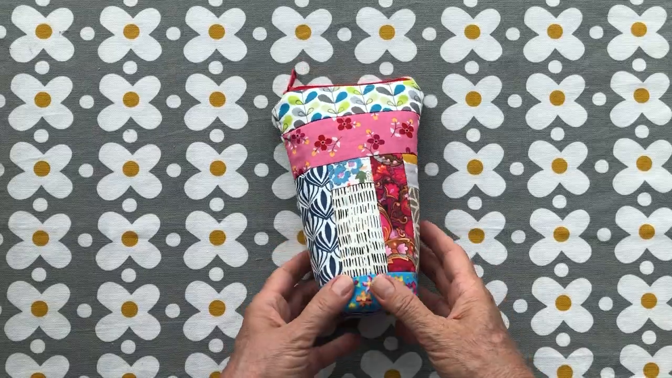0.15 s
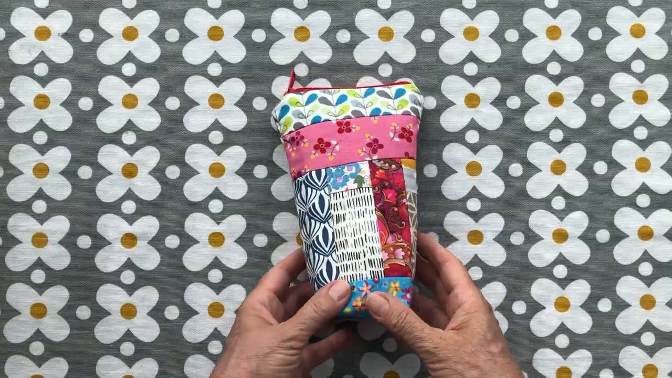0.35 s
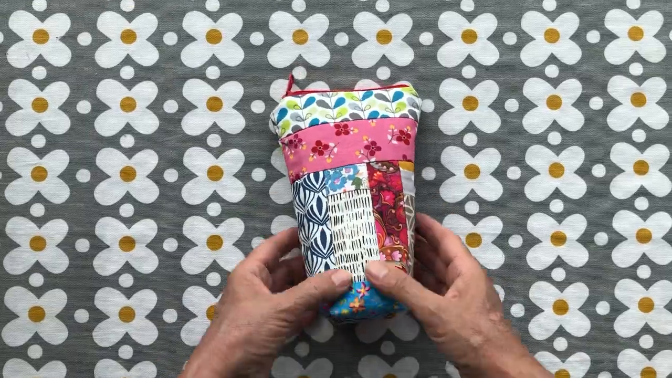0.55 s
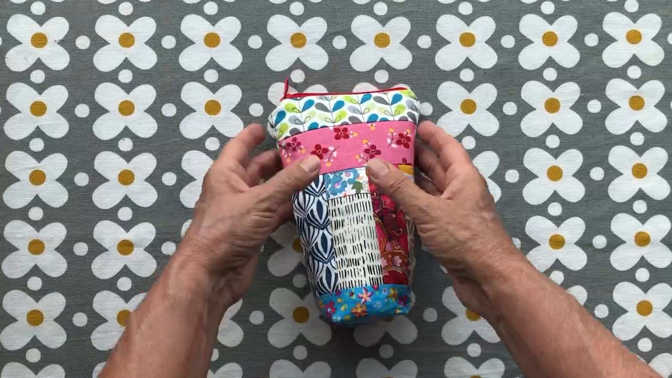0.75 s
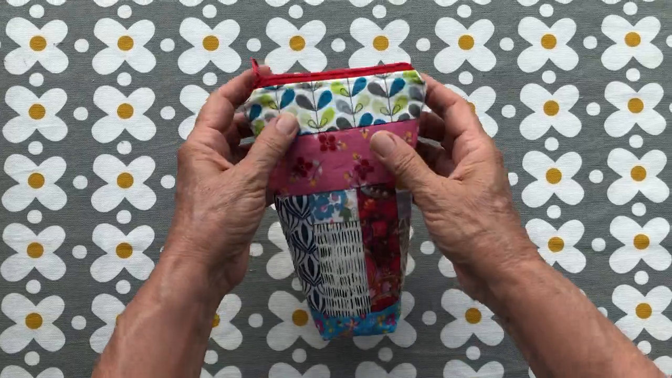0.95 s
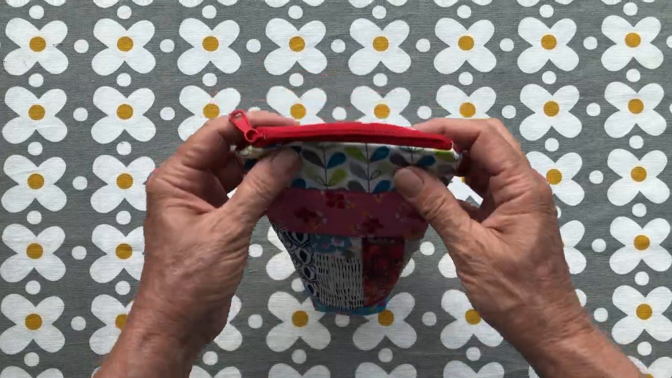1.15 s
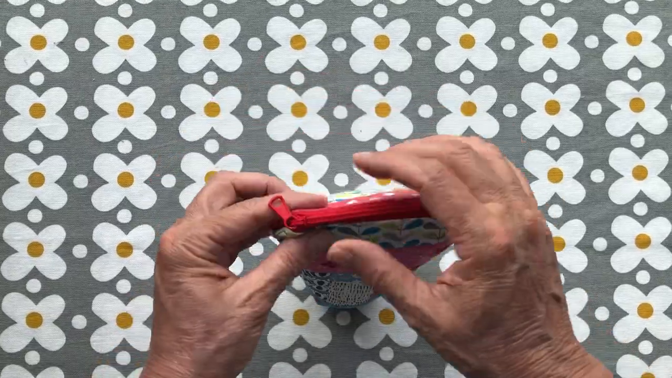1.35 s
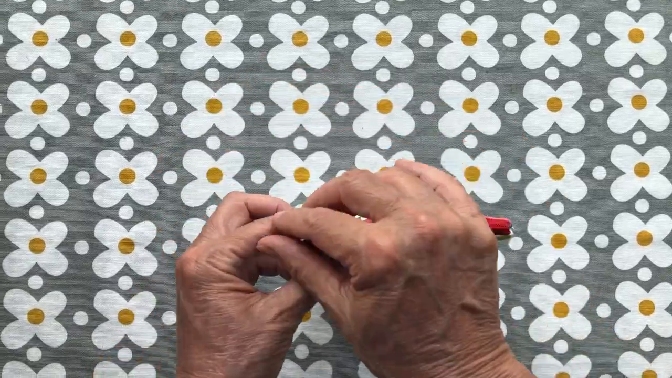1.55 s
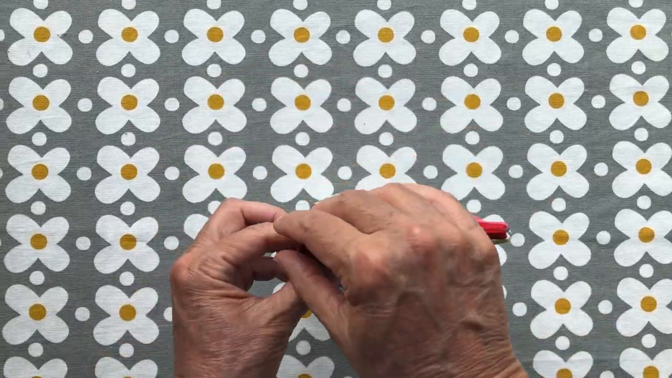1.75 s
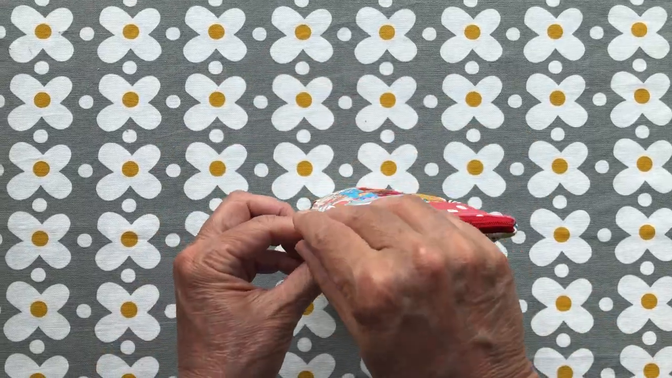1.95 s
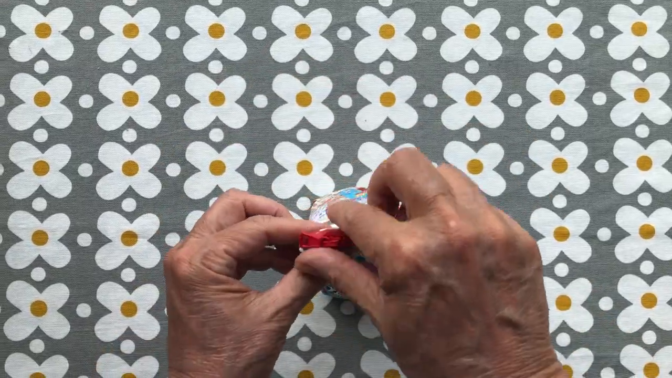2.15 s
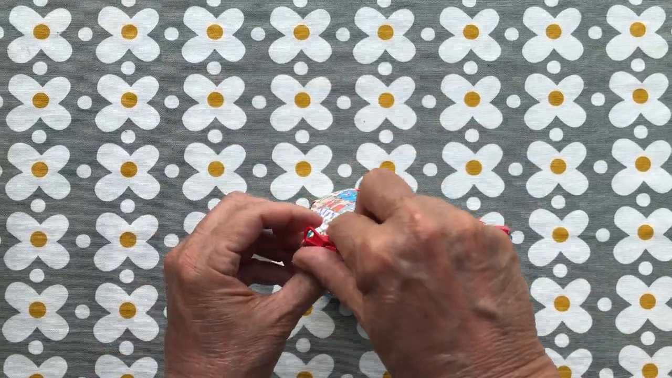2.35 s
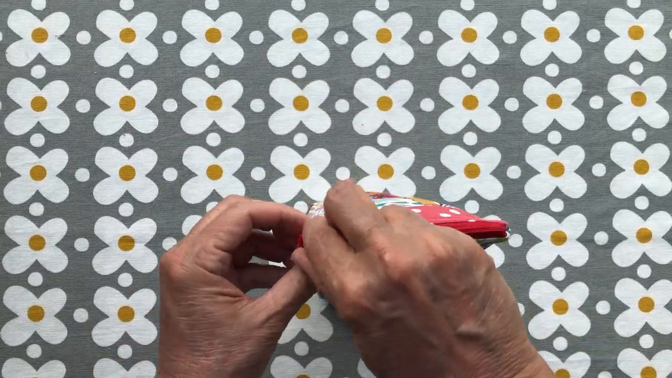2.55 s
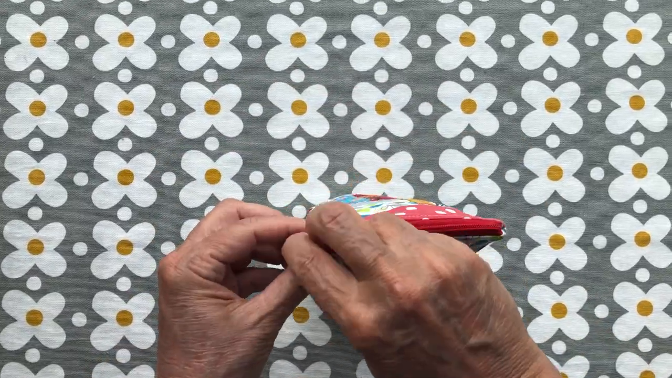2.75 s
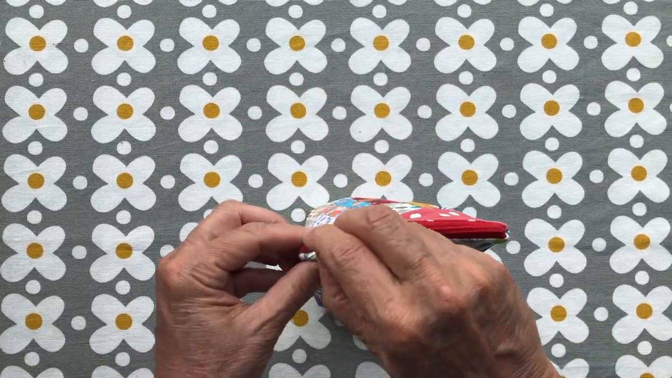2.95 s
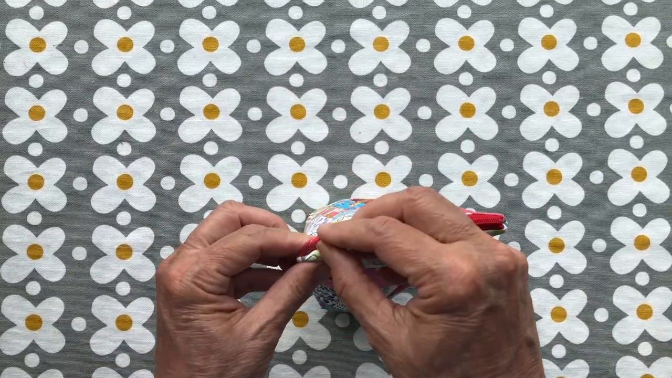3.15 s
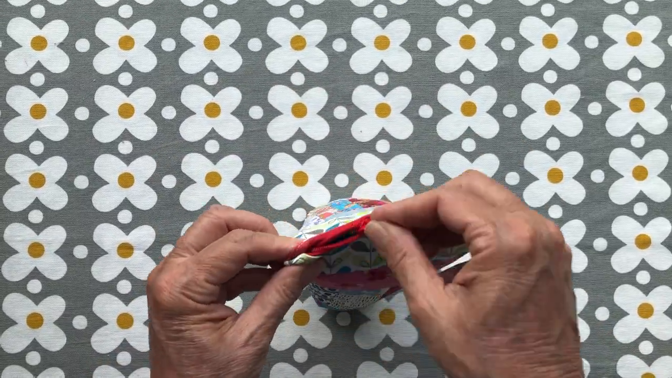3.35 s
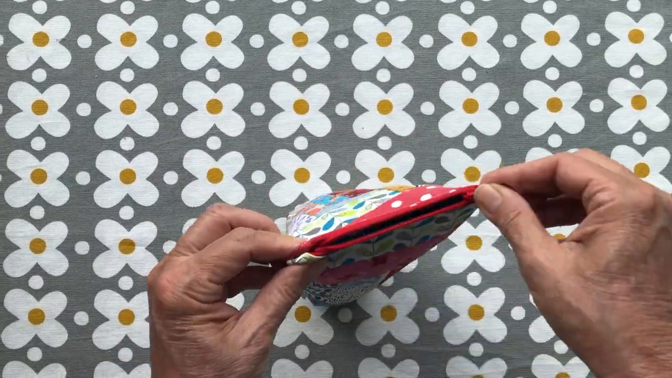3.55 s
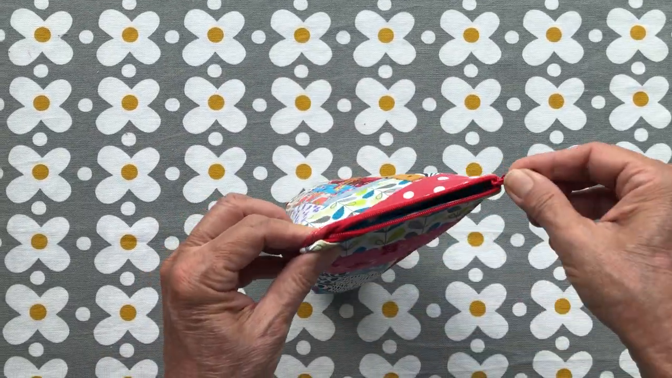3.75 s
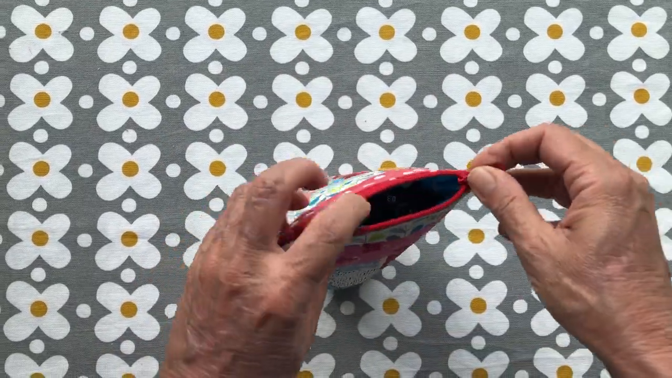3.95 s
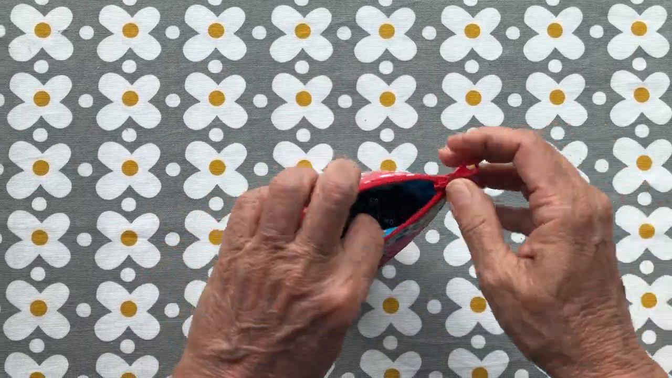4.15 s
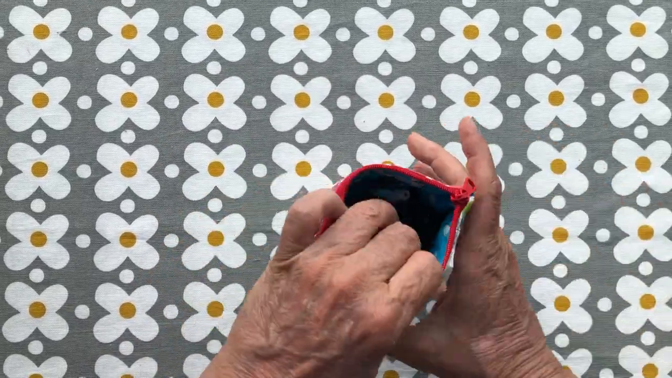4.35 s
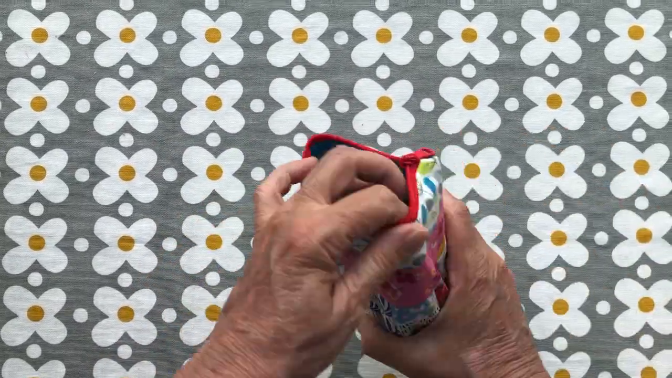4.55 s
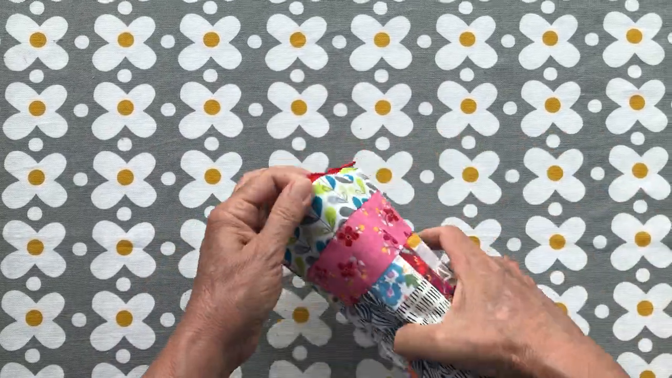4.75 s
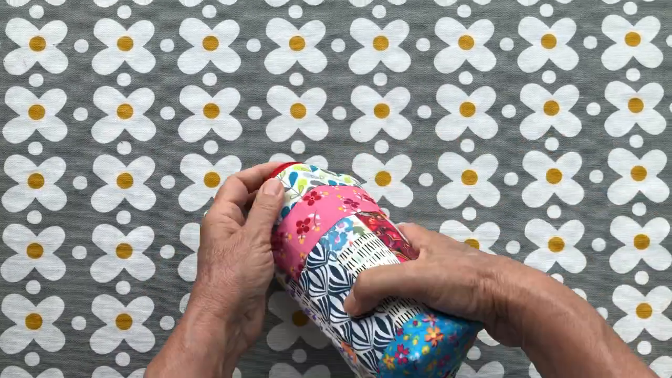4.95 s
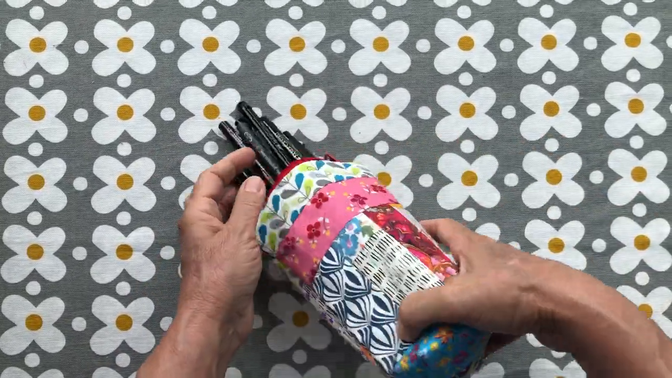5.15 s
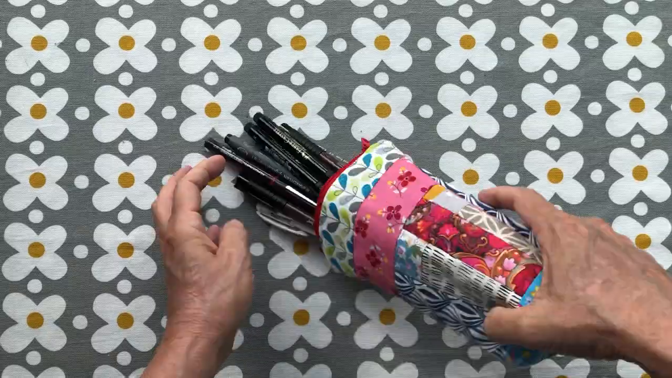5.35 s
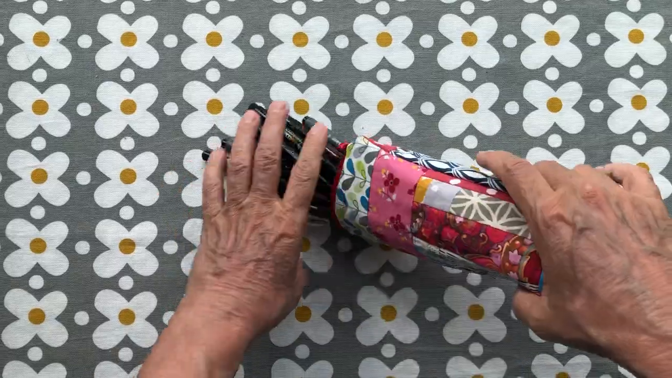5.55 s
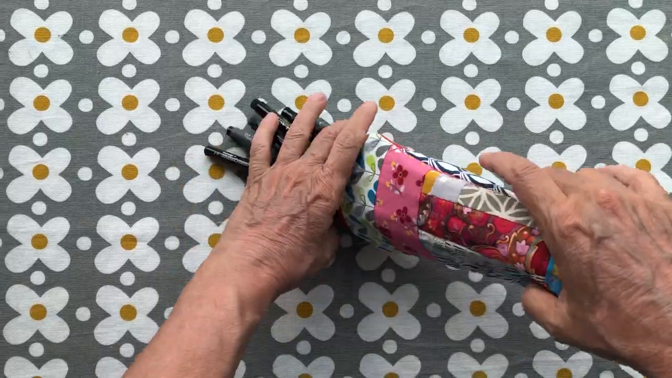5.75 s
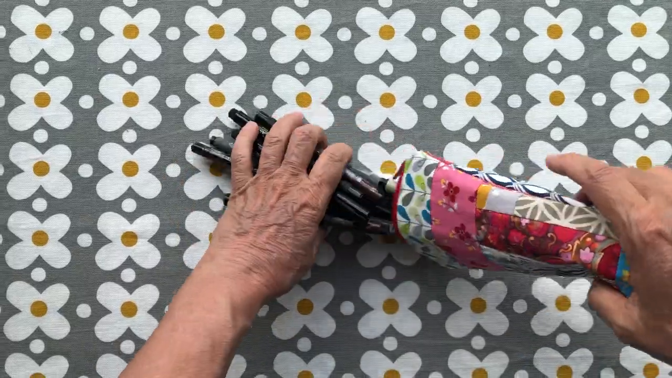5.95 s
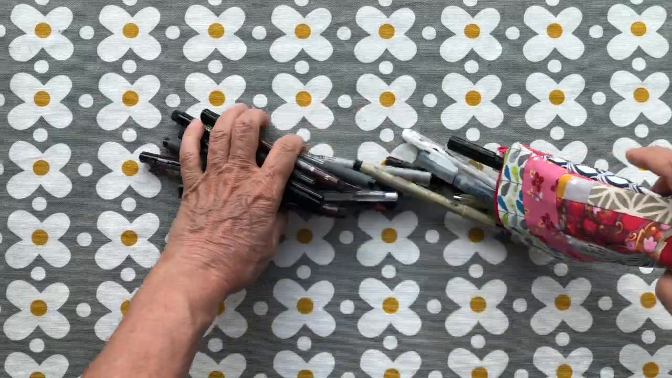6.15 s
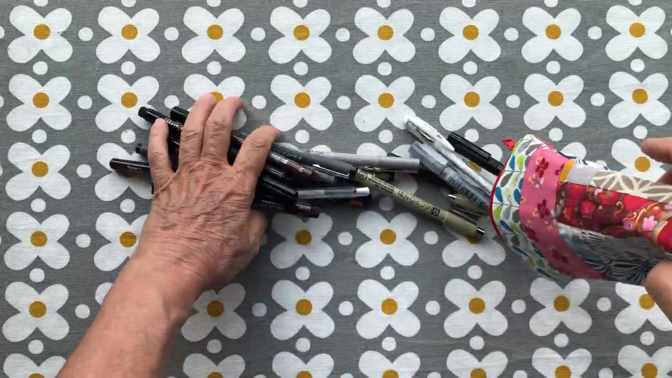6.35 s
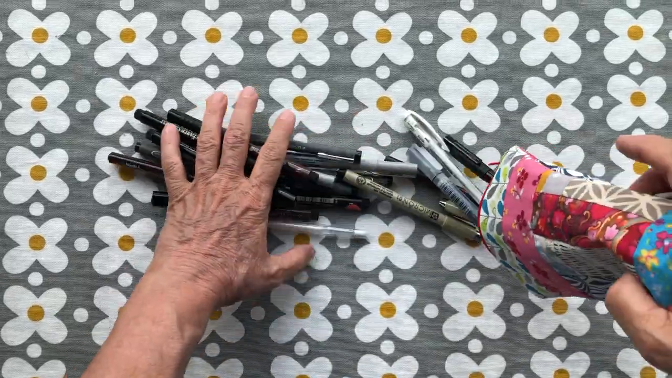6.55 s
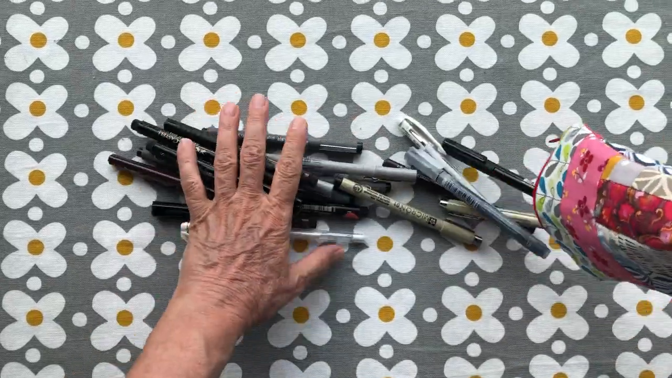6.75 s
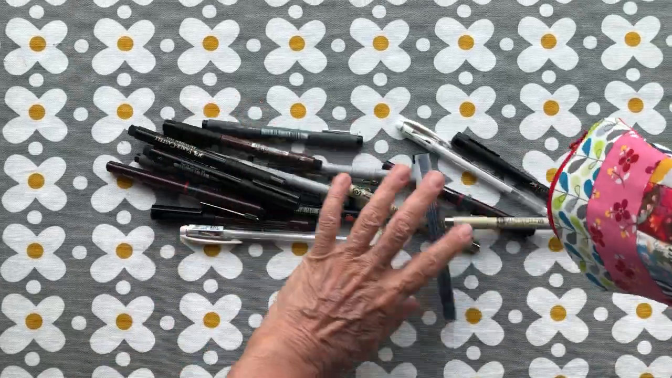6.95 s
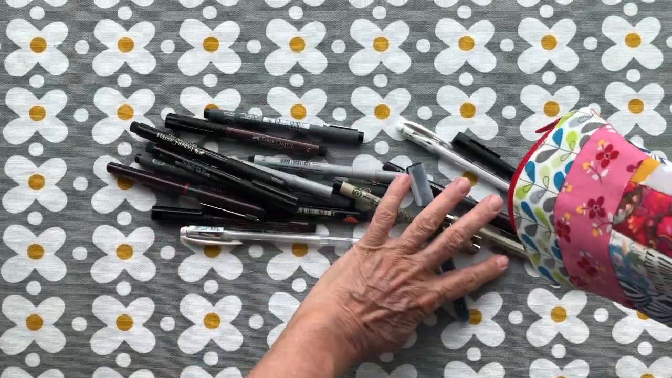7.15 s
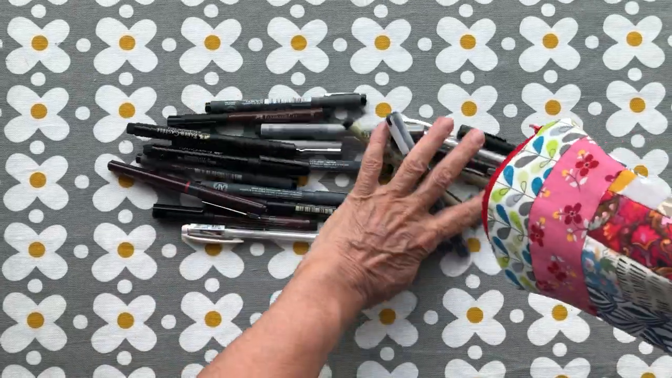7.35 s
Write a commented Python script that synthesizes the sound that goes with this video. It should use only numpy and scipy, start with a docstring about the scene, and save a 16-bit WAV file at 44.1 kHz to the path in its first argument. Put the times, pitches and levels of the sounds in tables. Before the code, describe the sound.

Hands rustle a fabric pouch and unzip it, then pens slide out, clicking together and knocking on a table.

```python
"""A few plastic clicks, a soft bump and a rustle: hands pick up a fabric pouch full of pens.
They stand it on a cloth-covered table and unzip it in one quickening pull, the teeth running
from hollow ticks into a whine. Fingers catch and slip on the weave until the pouch is tipped
over: pens scrape out along the lining, click against each other and knock on the table top.
All is heard close up in a small, quiet room."""
import sys
import numpy as np
from scipy import signal
from scipy.fft import rfft, irfft, next_fast_len
from scipy.io import wavfile
from scipy.ndimage import uniform_filter1d, map_coordinates

SR = 44100
rng = np.random.default_rng(int(sys.argv[2]) if len(sys.argv) > 2 else 0)


def wav_out(sig):
    """Save sig, one row per channel (or a flat mono array), as 16-bit PCM at SR to the path in sys.argv[1]."""
    wavfile.write(sys.argv[1], SR, np.round(np.clip(np.atleast_2d(sig).T, -1, 1) * 32767).astype(np.int16))


N = 326340
TIME = np.arange(N) / SR
RING_TIME = np.arange(SR // 3) / SR

# the sharpest pen-on-pen hits: (time [s], level [dB], clack pitch [Hz], snap brightness [dB])
PEN_CLICKS = [(.0925, -36.5, 2200, -14), (0.1015, -32.5, 4830, -15), (0.1119, -36, 2560, 6.5),
              (1.054, -51, 2390, -2), (3.962, -46.5, 3700, -14), (4.3832, -49, 3160, -16),
              (4.461, -52, 3130, -8), (4.5198, -42.5, 4900, -3), (4.5403, -42.5, 4660, -25),
              (4.591, -45, 4670, -17), (4.632, -44, 4760, -19), (4.676, -40, 2940, -4),
              (4.9468, -39, 3800, 2), (5.001, -34, 5730, -7), (5.04, -43, 2100, 11.5),
              (5.0577, -38, 5000, 5), (5.0796, -31.5, 2450, 0.5), (5.1118, -34.5, 4770, 0),
              (5.1376, -31, 3080, 3), (5.213, -38.5, 5700, -10), (5.3363, -39, 2270, -5),
              (5.6024, -41.5, 2420, -27), (5.6187, -39.5, 3180, -8), (5.648, -45, 2590, -5),
              (5.7803, -45.5, 2270, -25), (5.8494, -44, 3200, 4.5), (5.9623, -40, 3930, 2),
              (6.0093, -29, 3640, -25), (6.036, -35, 3430, -13), (6.096, -32, 4300, -6),
              (6.108, -33.5, 3410, -10), (6.155, -29, 4600, -6), (6.2155, -47.5, 3550, 14),
              (6.228, -45, 3500, 10), (6.24, -32.5, 5200, -22), (6.5052, -24.5, 3600, -35),
              (6.5517, -37.5, 4280, 9.5), (6.562, -38, 3100, -1), (6.6496, -24.5, 4330, -20),
              (6.7247, -42, 4590, -16), (6.7536, -44.5, 3820, -22), (6.823, -45, 1920, -11),
              (6.8399, -38.5, 2890, -24), (6.9108, -32.5, 2650, -11), (6.9363, -27.5, 2580, -30),
              (7.058, -38.5, 3160, -23), (7.1409, -45.5, 3270, 10.5), (7.1756, -46.5, 3820, -10),
              (7.2456, -40.5, 4350, 6), (7.2932, -40, 4080, -3), (7.3558, -35, 4270, -1),
              (7.372, -32, 4140, -3)]
# ring of a pen barrel: (frequency [Hz], level [dB], t60 [s])
BARREL_MODES = [(2840, 0, 0.017), (3243, 11.5, 0.032), (4200, -26.5, 0.014), (4100, 11, 0.044),
                (4900, 4.5, 0.046), (5900, 1, 0.038)]
# shoves that send the pens sliding: (peak time [s], level [dB], rise [s], fall [s])
PEN_SHOVES = [(4.96, -51.5, .025, 0.16), (5.125, -40.5, 0.15, .115), (5.225, -53, 0.04, 0.28),
              (5.43, -62, 0.13, 0.8), (5.62, -60.5, 0.086, 0.14), (5.865, -51, 0.037, 0.47),
              (5.99, -45.5, 0.17, 0.25), (6.105, -45.5, 0.085, 0.23), (6.245, -50, 0.043, 0.096),
              (6.49, -54.5, 0.25, 0.2), (6.66, -57.5, 0.26, 0.28), (6.948, -45, 0.041, 0.16),
              (7.178, -60, .015, 0.21), (7.3, -48, 0.017, 0.054), (7.395, -42, 0.088, 0.088)]
# colour of pens on the lining: (frequency [Hz], level [dB])
SCRAPE_SPECTRUM = [(180, -8), (300, -1.5), (433, 1), (584, -16.5), (814, -11.5), (915, -10), (1430, -7.5),
                   (1610, -7), (4230, -9.5), (14200, -19.5), (16000, -38.5)]
# pouch and pens landing on the table: (time [s], level [dB], contact time [ms])
LANDINGS = [(.089, -39, 6.5), (.117, -47.5, 3.5), (1.346, -35.5, 2.4), (1.361, -44.5, 3.1),
            (4.266, -58.5, 0.8), (4.933, -51.5, 1), (5.085, -33.5, 0.93), (5.095, -35.5, 1.07),
            (5.134, -33, 7), (5.161, -34, 7), (5.338, -43.5, 3.5), (5.616, -56, 0.69), (6.009, -47, 0.3),
            (6.096, -33, 3.9), (6.195, -40, 2.9), (6.25, -38, 1.8), (6.505, -45.5, 2.5), (6.548, -42, 1.9),
            (6.65, -37, 2.2), (6.672, -37, 0.72), (6.935, -33, 0.17), (7.004, -41, 1.04),
            (7.113, -41, 0.67), (7.175, -41, 4.5), (7.214, -44.5, 1.24)]
# table top modes: (frequency [Hz], level [dB], t60 [s])
TABLE_FLEX_MODES = [(144, 0, .23), (215, -5, .18)]  # the whole top flexing
TABLE_THUD_MODES = [(292.5, -1.5, 0.16), (321.8, 3, 0.16), (417, 3, 0.072), (502, -2.5, 0.25)]  # stirred by a firm landing
TABLE_RAP_MODES = [(730, -3, 0.032), (858, 7, 0.091), (1127, 10.5, 0.07), (1414, 21.5, 0.033),
                   (1690, 12, 0.044), (2050, 18, 0.032), (2450, -11, 0.028), (2610, 10.5, 0.037)]  # struck by hard plastic
# a tug, the long run, a last tug: (peak time [s], tooth rate [Hz], level [dB], rise [s], fall [s])
ZIP_PULLS = [(3.333, 160, -54.5, 0.046, .075), (3.528, 655, -44.5, .087, .042),
             (3.668, 290, -50, .013, 0.025)]
# resonances that voice the zip: (frequency [Hz], width [Hz], level [dB])
TAPE_RESONANCES = [(350, 170, 2.5), (570, 200, -1), (1200, 240, 2), (1930, 300, -.5), (2470, 400, -1),
                   (3700, 1500, -10)]  # the taut tape
POUCH_RESONANCES = [(345, 124, 5.5), (1250, 310, -9.5), (1850, 300, -8.5), (5000, 480, -17)]  # the hollow pouch beneath it
# colour of the slider scraping the teeth: (frequency [Hz], level [dB])
RASP_SPECTRUM = [(120, -40), (300, -13), (1200, -8.5), (2400, -6), (3200, -11), (5000, -9), (9000, -15),
                 (16000, -21)]
# fingers take the pull tab or let it go: (time [s], tinkle level [dB], tick level [dB])
TAB_TOUCHES = [(1.5233, -53, -57.5), (1.5409, -49, -58), (1.7644, -76, -61), (1.7953, -60, -54.5),
               (2.396, -78, -68), (2.975, -78, -63.5), (4.257, -44, -55)]
# ring of the metal tab: (frequency [Hz], level [dB], t60 [s])
TAB_MODES = [(11500, 12, 0.025), (12000, 7, 0.056), (11160, 5, 0.029), (8440, -7, 0.019)]
# hand strokes on the fabric: (peak time [s], level [dB], rise [s], fall [s])
HAND_STROKES = [(.062, -50.5, 0.015, 0.13), (.105, -47, 0.083, 0.062), (.2, -68.5, 0.09, 0.28),
                (.8, -63, 0.23, 0.54), (.864, -56.5, 0.031, 0.078), (1.085, -54, 0.31, 0.07),
                (1.243, -61.5, 0.036, 0.24), (1.352, -50.5, 0.024, 0.055), (1.58, -60.5, 0.065, 0.056),
                (2.165, -65, 0.1, 0.025), (2.486, -67, 0.18, 0.087), (2.68, -70.5, 0.11, 0.51),
                (3.025, -75, .12, .06), (3.238, -65, 0.023, 0.13), (3.91, -65, .03, 0.39),
                (3.965, -55.5, 0.068, 0.047), (4.075, -63.5, .015, 0.26), (4.272, -53, 0.028, 0.11),
                (4.393, -54.5, 0.016, 0.058), (4.49, -55.5, 0.029, .15), (4.56, -53, 0.11, 0.11),
                (4.671, -52, 0.094, 0.045), (4.85, -60, 0.26, 0.32)]
# palms sliding over the table cloth: (time [s], level [dB])
PALM_GLIDE = [(.55, -86), (.59, -71), (.75, -69.5), (1.05, -95), (1.11, -66.5), (1.2, -83)]
# colours of the hands on the pouch: (frequency [Hz], level [dB])
THREAD_SPECTRUM = [(120, -37), (220, -6), (600, -3.5), (1200, 0.5), (2200, 2.5), (4500, -2.5), (8000, -6),
                   (16000, -21)]  # threads catching
SKIN_SPECTRUM = [(300, 0), (1500, -2), (4000, -2), (8500, -3.5), (16000, -5.5)]  # skin gliding on cotton
# decay of the room: (frequency [Hz], t60 [s])
ROOM_DECAY = [(150, 0.43), (1000, 0.24), (5000, 0.093), (15000, 0.083)]
# colour of the still air: (frequency [Hz], level [dB])
AIR_SPECTRUM = [(15, -52), (25, -19), (59, 1), (185, -7), (229, -8), (285, -7), (677, -14.5), (818, -17),
                (1610, -23), (16000, -33)]

TOUCHDOWN_S = 5.085  # the tipped pouch meets the table; only then does sliding rumble
THUD_HZ, RAP_HZ = 350, 1390  # contacts longer than a cycle of these barely stir the thud, the rap
ZIP_START_S, ZIP_END_S = 3.29, 3.695
CRAWL_HZ, CRAWL_DB = 100.8, -66.5  # tooth rate and base level between pulls
STEADY_FROM_HZ, STEADY_AT_HZ = 150, 355  # tooth rates over which a taut zip falls into step
TOP_HZ = 16300


def pen_clicks(clack_db=-4, chatter_db=-3.5, snap_db=-5, barrel_db=-14, damping=.56):
    """Plastic on plastic: a damped clack, brief chatter, a bright snap and a faint barrel ring."""
    out = np.zeros(N)
    for s, db, hz, bright_db in PEN_CLICKS + pen_jostles():
        envelope = np.exp(-RING_TIME / .00058) * (1 - np.exp(-RING_TIME / .000062))
        clack = np.sin(2 * np.pi * hz * RING_TIME) * envelope
        rattle = puff(life=.0022) + .25 * puff(life=.009)
        chatter = highpass(resonate(rattle, [(hz, damping * hz, 0)]), edge_hz=800)
        snap = highpass(puff(life=.0016), edge_hz=4500)
        barrel = ring(BARREL_MODES, scatter_db=3, attack=.0003)
        parts = [(clack_db, clack), (chatter_db, chatter),
                 (bright_db + snap_db, snap), (barrel_db, barrel)]
        add(out, s, sum(amp(db + part_db) * burst(part, span=.0013) for part_db, part in parts))
    return out


def pen_jostles(over_db=2, spread_db=3, clack_hz=3600, bright_db=-3, still_db=-55, count=230):
    """Chance clicks that ride the level of the slide and drop out in lulls; rows as in PEN_CLICKS."""
    chance = rng.random((count, 4))
    s = (np.arange(count) + chance[:, 0]) / count * N / SR
    size, pitch, edge = (2 * chance[:, 1:] - 1).T
    slide_db = 20 * np.log10(np.interp(s, TIME, swells(PEN_SHOVES)))
    db = slide_db + over_db + spread_db * size
    rows = np.column_stack([s, db, clack_hz * np.exp(.45 * pitch), bright_db + 8 * edge])
    return list(rows[db > still_db])


def pen_slide(scrape_db=-2, tick_db=-2, tick_hz=3700, rumble_db=-8, rumble_growth=.61, count=750):
    """Pens scrape along the lining with tiny ticks; a harder shove makes the table rumble more."""
    level_db = 20 * np.log10(swells(PEN_SHOVES))
    scrape = coloured(grains(rate=6000, spread_db=4), SCRAPE_SPECTRUM) * amp(1.8 * wobble(rate=90))
    ticks, t = np.zeros(N), RING_TIME[:SR // 100]
    for s, (pitch, size) in zip(rng.uniform(0, N / SR, count), rng.standard_normal((count, 2))):
        hz = min(tick_hz * np.exp(.4 * pitch), TOP_HZ)
        tick = np.sin(2 * np.pi * hz * t) * np.exp(-t * hz / 1.1)
        add(ticks, s, amp(3.5 * min(size, 2)) * tick)
    friction = amp(level_db) * (amp(scrape_db) * scrape + amp(tick_db) * unit(ticks))
    judder = grains(rate=300, spread_db=3)
    rumble = unit(signal.fftconvolve(judder, ring(TABLE_FLEX_MODES, scatter_db=1, attack=.001))[:N])
    table_db = level_db.max() + rumble_growth * (level_db - level_db.max()) + rumble_db
    on_table = np.clip((TIME - TOUCHDOWN_S) / .01, 0, 1)
    return friction + amp(table_db) * rumble * on_table


def table_knocks(thud_db=-3.5, rap_db=-2, ring_db=-4):
    """Soft landings flex the table top; firm ones add a thud, and bare pens rap its higher modes."""
    out = np.zeros(N)
    for s, db, contact_ms in LANDINGS:
        contact_cycles = np.array([THUD_HZ, RAP_HZ]) * contact_ms / 1000
        firm, hard = 1 / (1 + contact_cycles ** 3)
        flex = burst(ring(TABLE_FLEX_MODES, scatter_db=1, attack=.002), span=.004)
        weight = resonate(puff(life=.02), [(70, 50, -6), (190, 140, 0)])
        push = burst(resonate(weight, [(150, 500, 0)]), span=.004)
        boom = .65 * flex + .3 * push
        bump_band = [(340, 400, 0)]
        bump = burst(resonate(resonate(puff(life=.016), bump_band), bump_band), span=.0068)
        thud_ring = burst(ring(TABLE_THUD_MODES, scatter_db=1, attack=.00055), span=.015)
        thud = amp(ring_db) * thud_ring + bump
        rap = burst(ring(TABLE_RAP_MODES, scatter_db=3, attack=.0006), span=.008)
        crack = burst(resonate(puff(life=.0063), [(730, 270, -3.5), (2510, 980, -11.5)]), span=.013)
        add(out, s, amp(db) * (boom + firm * amp(thud_db) * thud + hard * amp(rap_db) * (rap + crack)))
    return out


def zipper(rasp_db=-3, hollow_db=-1, whine_db=-1, growth=1.38, slack=2, harmonics=7):
    """Teeth rasp through the slider: hollow ticks when slow, a whine voiced by the tape when fast."""
    gate = during([(ZIP_START_S,), (ZIP_END_S,)], fade=.008)
    moving = gate > 0
    t = TIME[moving]
    rate, taut_rate, level = CRAWL_HZ, CRAWL_HZ, amp(CRAWL_DB)
    for s, top_hz, db, rise, fall in ZIP_PULLS:
        effort = np.exp(-((t - s) / np.where(t < s, rise, fall)) ** 2)
        tension = np.where(t < s, 1, effort ** slack)  # the tape goes slack as the hand eases off
        rate = rate + (top_hz - CRAWL_HZ) * effort
        taut_rate = taut_rate + (top_hz - CRAWL_HZ) * effort * tension ** 6
        level = level + amp(db) * effort ** growth * tension
    in_step = np.interp(taut_rate, [STEADY_FROM_HZ, STEADY_AT_HZ], [0, 1])
    teeth_passed = np.cumsum(rate * (1 + .01 * wobble(rate=120)[moving])) / SR
    whine = np.zeros(len(t))
    for k in range(1, harmonics + 1):
        tape_gain = np.abs(response(TAPE_RESONANCES, k * rate)) ** 2  # squared for deep valleys
        whine += tape_gain / np.sqrt(k) * np.sin(2 * np.pi * (k * teeth_passed + rng.random()))
    contact = .25 + np.exp(-5 * (teeth_passed % 1))  # one pulse per tooth
    rasp = coloured(contact * rng.standard_normal(len(t)), RASP_SPECTRUM)
    hollow = unit(resonate(contact * rng.standard_normal(len(t)), POUCH_RESONANCES))
    slow = np.clip(170 / rate, 0, 1)
    voice = amp(whine_db) * in_step * whine + amp(rasp_db) * rasp + amp(hollow_db) * slow * hollow
    out = np.zeros(N)
    out[moving] = level * voice
    return out * gate


def pull_tab(tinkle_trim_db=-7, tick_trim_db=-1, tick_hz=2150, tick_width_hz=900):
    """The little metal tab tinkles and ticks against the slider when it is taken and let go."""
    out = np.zeros(N)
    for s, tinkle_db, tick_db in TAB_TOUCHES:
        tinkle = burst(ring(TAB_MODES, scatter_db=2, attack=.0004), span=.003)
        tap = resonate(puff(life=.005), [(tick_hz, tick_width_hz, 0)])
        tick = burst(highpass(tap, edge_hz=900), span=.0013)
        add(out, s, amp(tinkle_db + tinkle_trim_db) * tinkle + amp(tick_db + tick_trim_db) * tick)
    return out


def fabric_rub(rub_db=-1, glide_db=-65, body_db=-10.5, drag_db=3):
    """Pressed threads catch and slip; a light touch hisses; the padded pouch rumbles as it drags."""
    rub = swells(HAND_STROKES) * amp(1.8 * wobble(rate=90))
    palms = amp(np.interp(TIME, *np.transpose(PALM_GLIDE))) * during(PALM_GLIDE)
    threads = coloured(grains(rate=7000, spread_db=3.5), THREAD_SPECTRUM)
    hiss = coloured(rng.standard_normal(N), SKIN_SPECTRUM)
    body = unit(resonate(rng.standard_normal(N), [(64.6, 47, -4.5), (151, 24, -.5), (277, 250, -11.5)]))
    grip = rub / (rub + amp(glide_db))  # share of the touch that catches the weave
    rustle = amp(rub_db) * grip * rub * threads
    glide = (palms + (1 - grip) * rub) * hiss
    rumble = (amp(body_db) * rub + amp(drag_db) * palms) * body
    return rustle + glide + rumble


def room_echo(x, delay_s=.005):
    """The walls' short answer, dying sooner in the treble."""
    hz, t, noise = signal.stft(rng.standard_normal(SR // 2), SR, nperseg=256)
    decay = np.exp(-np.log(1000) * t / along(ROOM_DECAY, hz)[:, None])
    _, tail = signal.istft(noise * decay, SR, nperseg=256)
    delayed = np.pad(x, (int(delay_s * SR), 0))
    return signal.fftconvolve(delayed, tail / np.linalg.norm(tail))[:N]


def room_tone():
    """Still air: a steady bed of dark noise."""
    return coloured(rng.standard_normal(N), AIR_SPECTRUM)


def amp(db):
    """Decibels to gain."""
    return 10 ** (np.asarray(db) / 20)


def unit(x):
    """Scale to rms 1."""
    return x / np.sqrt(np.mean(x ** 2) + 1e-20)


def burst(x, span):
    """Scale so that the loudest span seconds have rms 1."""
    power = uniform_filter1d(x ** 2, max(int(span * SR), 1), mode="constant")
    return x / np.sqrt(power.max())


def along(points, hz):
    """Read (frequency, value) points on a log axis."""
    f, values = np.transpose(points)
    return np.interp(np.log(hz + 1), np.log(f + 1), values)


def during(rows, fade=.02):
    """A gate, open from the first row's time to the last, with fades in seconds."""
    opening = np.clip((TIME - rows[0][0]) / fade + 1, 0, 1)
    closing = np.clip((rows[-1][0] - TIME) / fade + 1, 0, 1)
    return opening * closing


def swells(rows, points=3700):
    """Gestures that grow tenfold over their rise and die tenfold over their fall, added in power."""
    t = np.linspace(0, N / SR, points)
    power = sum(amp(db) ** 2 * 10 ** (-2 * np.maximum((s - t) / rise, (t - s) / fall))
                for s, db, rise, fall in rows)
    return np.interp(TIME, t, np.sqrt(power + 1e-14))


def wobble(rate):
    """A smooth random curve, rate knots a second."""
    return map_coordinates(rng.standard_normal(int(N * rate / SR) + 4), [TIME * rate])


def filtered(x, gain):
    """Apply a gain that is a function of frequency."""
    size = next_fast_len(len(x) + 8192)
    return irfft(rfft(x, size) * gain(np.fft.rfftfreq(size, 1 / SR)), size)[:len(x)]


def coloured(x, spectrum):
    """Shape x with a spectrum, at rms 1."""
    return unit(filtered(x, lambda hz: amp(along(spectrum, hz))))


def response(peaks, hz):
    """Complex gain of resonances: (frequency [Hz], width [Hz], level [dB])."""
    return sum((-1) ** k * amp(db) * 1j * hz * width / (centre ** 2 - hz ** 2 + 1j * hz * width)
               for k, (centre, width, db) in enumerate(peaks))


def resonate(x, peaks):
    """Pass x through resonances: (frequency [Hz], width [Hz], level [dB])."""
    return filtered(x, lambda hz: response(peaks, hz))


def highpass(x, edge_hz, order=2):
    """Low cut."""
    return signal.sosfilt(signal.butter(order, edge_hz, "high", fs=SR, output="sos"), x)


def ring(modes, scatter_db, attack):
    """Damped modes; each blow lands elsewhere and stirs them at new strengths and signs."""
    hz, db, t60 = np.transpose(modes)[:, :, None]
    gain = amp(db + scatter_db * rng.standard_normal(hz.shape)) * rng.choice([-1, 1], hz.shape)
    waves = gain * np.exp(-np.log(1000) * RING_TIME / t60) * np.sin(2 * np.pi * hz * RING_TIME)
    return waves.sum(0) * (1 - np.exp(-RING_TIME / attack))


def puff(life):
    """Noise that dies with a time constant of life seconds."""
    return rng.standard_normal(len(RING_TIME)) * np.exp(-RING_TIME / life)


def grains(rate, spread_db):
    """Tiny random slips of uneven size, about rate a second, at rms 1."""
    size = amp(spread_db * np.clip(rng.standard_normal(N), -2, 2))
    return unit((rng.random(N) < rate / SR) * size * rng.choice([-1, 1], N))


def add(track, s, sound):
    """Mix a sound into a track at time s."""
    part = track[max(round(s * SR), 0):][:len(sound)]
    part += sound[:len(part)]


def scene(echo_db=-15, air_db=-70):
    """The handling up front, its echo and the room tone behind, in mono."""
    direct = zipper() + fabric_rub() + pen_slide() + table_knocks() + pull_tab() + pen_clicks()
    air = amp(air_db) * room_tone()
    return (direct + amp(echo_db) * room_echo(direct) + air)[None]


def record(dry):
    """Cut the deepest rumble and everything above TOP_HZ."""
    low_cut = highpass(dry[0], edge_hz=40, order=6)
    return filtered(low_cut, lambda hz: hz < TOP_HZ)[None]


dry = scene()
out = record(dry)
wav_out(out)
```